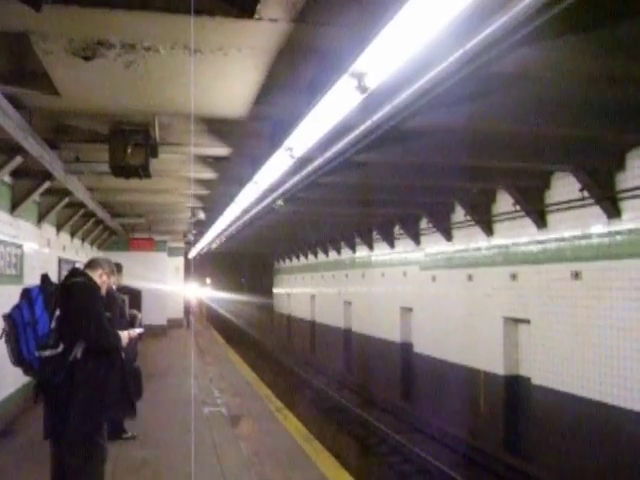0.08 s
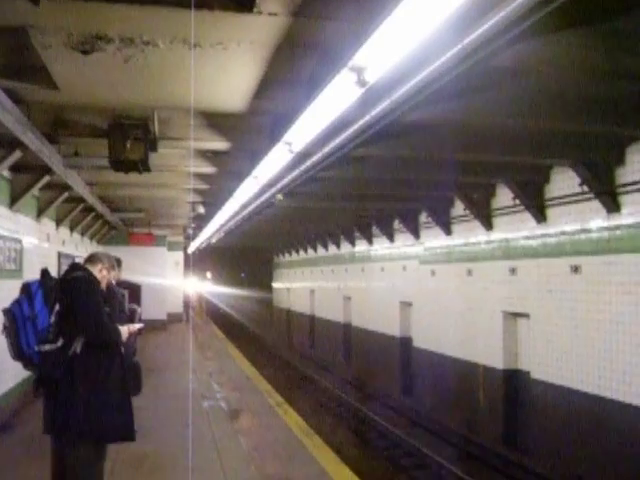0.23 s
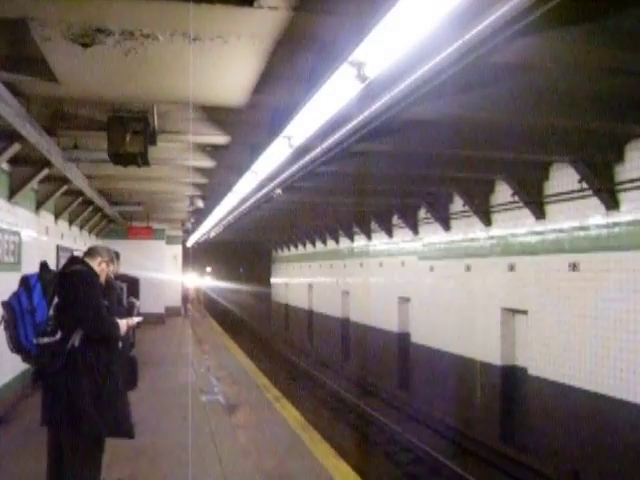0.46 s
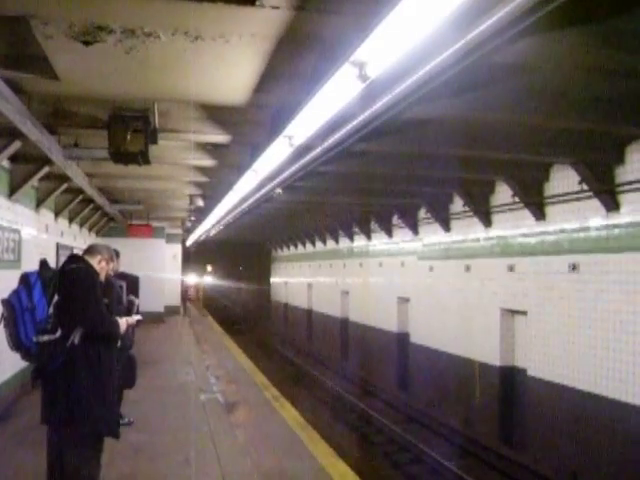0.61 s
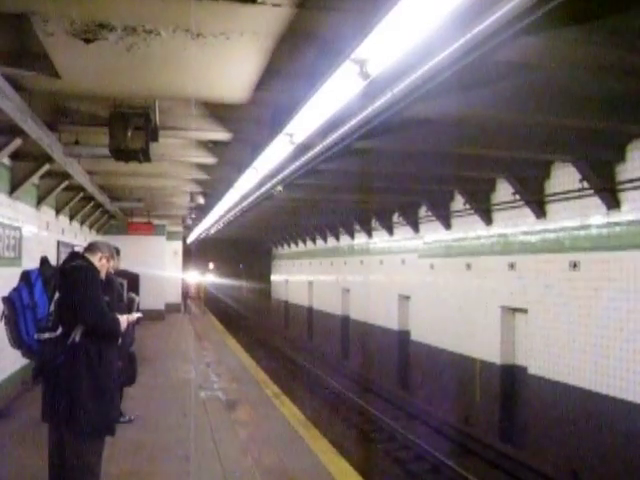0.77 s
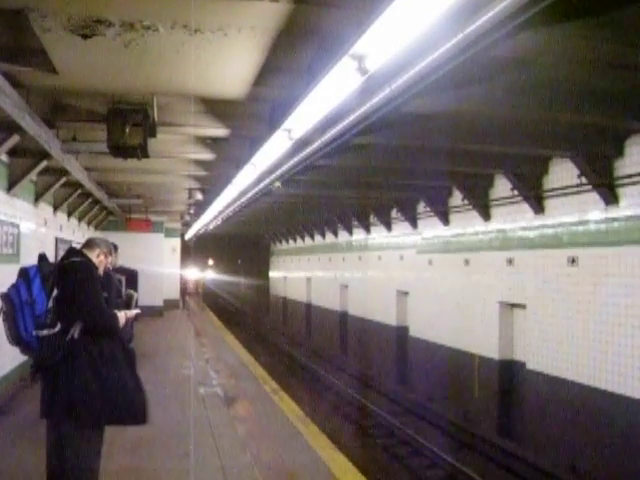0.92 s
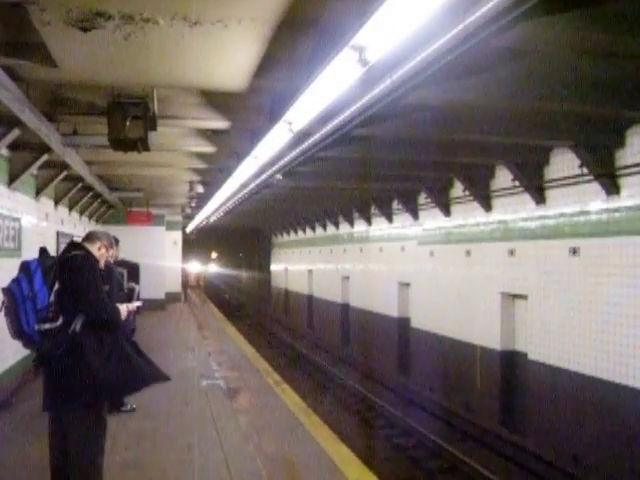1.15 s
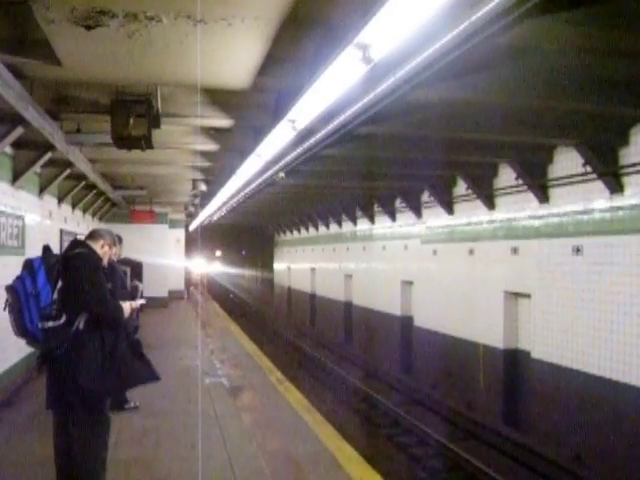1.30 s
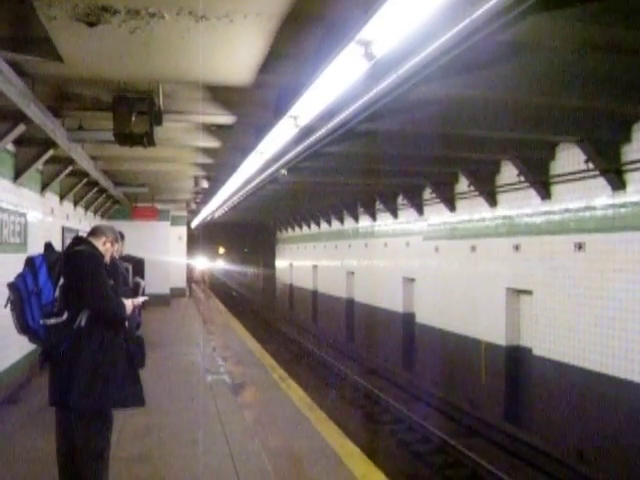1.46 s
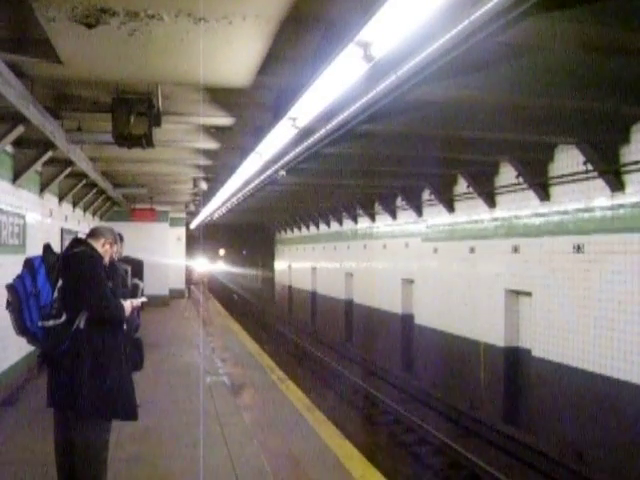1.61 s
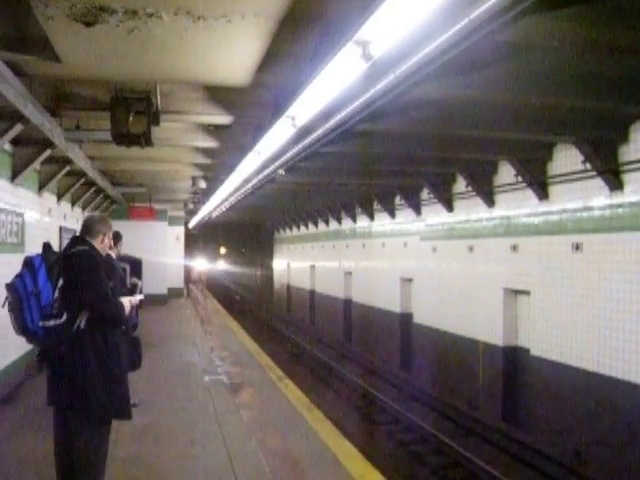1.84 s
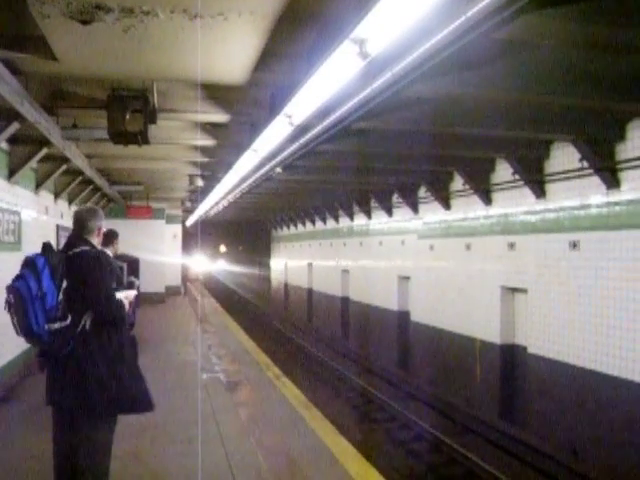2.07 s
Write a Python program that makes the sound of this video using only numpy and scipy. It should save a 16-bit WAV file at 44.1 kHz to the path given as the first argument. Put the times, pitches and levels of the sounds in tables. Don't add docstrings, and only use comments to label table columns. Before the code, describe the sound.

Subway train roars toward an underground platform, swelling in two loud, crackling, distorted surges

```python
import sys
import numpy as np
from scipy import signal
from scipy.fft import rfft, irfft
from scipy.io import wavfile
from scipy.ndimage import uniform_filter1d

SR = 44100
rng = np.random.default_rng(int(sys.argv[2]) if len(sys.argv) > 2 else 0)


def store_pcm(level_fs):
    pcm = np.round(np.clip(level_fs, -1, 1) * 32767).astype(np.int16)
    wavfile.write(sys.argv[1], SR, np.atleast_2d(pcm).T)


def boost(x):
    u = np.asarray(x, float) / 20
    return 10 ** u


N = 91904

# frequency_hz, density_db_per_hz
RUMBLE_SPECTRUM = [(20, -18), (60, -2.5), (130, 0.5), (300, -2), (700, -30.5)]
# start_s, level_db, pitch_hz, decay_s
GAP_CLUNKS = [
    (.0362, -16, 300, 0.025),
    (0.03, -21.5, 50, 0.031),
    (0.058, -35, 1400, 0.013),
    (0.419, -13, 330, 0.065),
    (0.437, -29, 1760, 0.018),
    (0.457, -10, 385, 0.034),
    (0.545, -11, 630, 0.0067),
    (0.545, -37, 1790, 0.017),
    (0.552, -27.5, 80.9, 0.14),
    (0.73, -24, 50, 0.056),
]
# time_s, level_db
ROAR_LEVEL = [(.03, -23), (.2, -20), (.39, -17), (.47, -19), (.55, -17.5), (.715, -12.5), (.75, -7.3),
              (.84, -7), (.9, -6), (1.0, -7.5), (1.14, -7.5), (1.28, -13.5), (1.37, -7), (1.5, -5.5),
              (1.62, -7), (1.72, -7.5), (1.9, -8), (2.08, -12.5)]
# frequency_hz, density_db_per_hz
ROAR_SPECTRUM = [(60, -27.5), (150, -13.5), (350, -2), (650, 1), (1050, -3.5), (1300, -15), (2700, -18),
                 (3900, -31.5)]
JOINT_KNOCKS = [.4624, .4712, .752, .7575, .768, .771, .7865, .7895, .796, .8095, .834, .845, .851, .8535,
                .8755, .8892, .8965, .9018, 1.0378, 1.0605, 1.293, 1.324, 1.334, 1.356, 1.624]
# start_s, drop_db, recovery_s
GAIN_DROPS = [
    (.484, -5, .06),
    (1.794, -7, .014),
    (.904, -6.5, .36),
    (1.627, -6, .5),
]

CAMERA_SR = 8000
FULL_SCALE = 0.7


def random_level(rate_hz):
    hold = int(SR / rate_hz)
    steps = np.repeat(rng.standard_normal(N // 200), hold)[:N]
    return 1.3 * uniform_filter1d(uniform_filter1d(steps, hold), hold)


def fluctuating_noise(spectrum, depth):
    hz = np.maximum(np.arange(N // 2 + 1) * SR / N, 1)
    table_hz, table_db = np.array(spectrum).T
    density_db = np.interp(np.log(hz), np.log(table_hz), table_db)
    colour = rfft(rng.standard_normal(N)) * boost(density_db) * (hz > 15) * (hz < 4000)
    swell = random_level(9)
    shared = [random_level(14) for _ in range(5)]
    out = np.zeros(N)
    for k, centre_hz in enumerate(20 * 2 ** np.arange(0, 8.5, 0.5)):
        octaves = np.clip(np.log2(hz / centre_hz), -0.5, 0.5)
        band = np.cos(np.pi * octaves) ** 2
        level_db = 0.6 * swell + 1.0 * shared[k // 4] + 1.5 * random_level(25)
        out += boost(depth * level_db) * irfft(colour * band, N)
    return out / np.std(out)


def tunnel_rumble(roar_db):
    rumble_db = -30.5 + 0.27 * (roar_db + 18.5)
    return boost(rumble_db) * fluctuating_noise(RUMBLE_SPECTRUM, 1.3)


def rail_gap_clunks(t):
    out = np.zeros(N)
    for start_s, level_db, pitch_hz, decay_s in GAP_CLUNKS:
        since = np.clip(t - start_s, 0, None)
        band = signal.butter(2, [pitch_hz / 2, pitch_hz * 2], "band", fs=SR, output="sos")
        burst = signal.sosfilt(band, rng.standard_normal(N))
        rise = 1 - np.exp(-since / 0.0013)
        out += boost(level_db) * burst / np.std(burst) * rise * np.exp(-since / decay_s)
    return out


def rolling_roar(roar_db):
    roar = fluctuating_noise(ROAR_SPECTRUM, 0.98)
    crest = 2.9
    return boost(roar_db) * roar / (1 + (roar / crest) ** 6) ** (1 / 6)


def add_joint_knocks(sound, t):
    width_s, rebound, overshoot = 0.0006, 0.2, 1.07
    for time_s in JOINT_KNOCKS:
        dip = np.exp(-((t - time_s) / width_s) ** 2)
        trough = (1 + rebound) * dip - rebound * dip ** (1 / 16)
        depth = overshoot * FULL_SCALE / camera_gain(time_s)
        sound = sound * (1 - dip) - depth * trough
    return sound


def camera_gain(t):
    gain_db = 0
    for start_s, drop_db, recovery_s in GAIN_DROPS:
        hold = np.clip(1 - np.abs((t - start_s) / recovery_s) ** 8, 0, 1)
        gain_db = gain_db + drop_db * (t > start_s) * hold
    return boost(gain_db)


def scene():
    t = np.arange(N) / SR
    roar_db = np.interp(t, *np.array(ROAR_LEVEL).T)
    sound = rolling_roar(roar_db) + tunnel_rumble(roar_db) + rail_gap_clunks(t)
    return add_joint_knocks(sound, t)[None]


def top_cut(x):
    return signal.sosfilt(signal.butter(12, 15800, fs=SR, output="sos"), x)


def record(dry):
    x = signal.resample_poly(dry[0] * camera_gain(np.arange(N) / SR), 80, 441)
    x = x * (np.arange(len(x)) / CAMERA_SR > 0.0364)
    x = np.where(np.abs(x) > FULL_SCALE, 0, x)
    fir = signal.firwin(441 * 32 + 1, 4010, window=("kaiser", 9), fs=CAMERA_SR * 441)
    y = signal.resample_poly(x, 441, 80, window=fir)[:N]
    y = np.clip(np.pad(y, (0, N - len(y))), -0.72, 0.72)
    return top_cut(y[None])


dry = scene()
out = record(dry)
store_pcm(out)
```